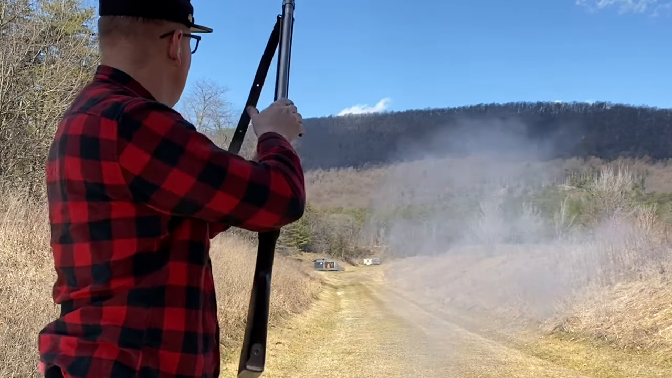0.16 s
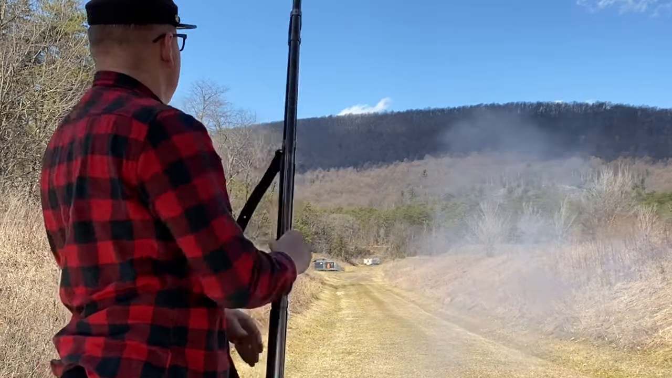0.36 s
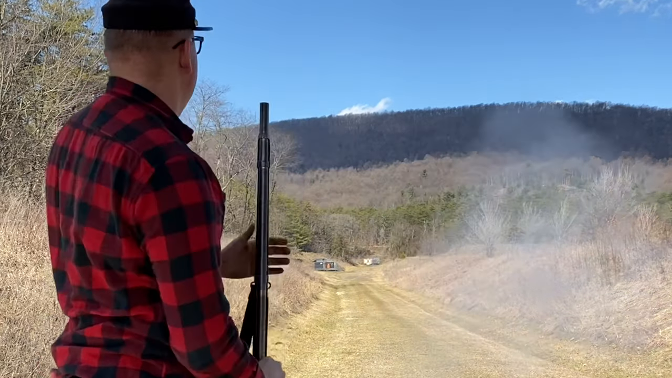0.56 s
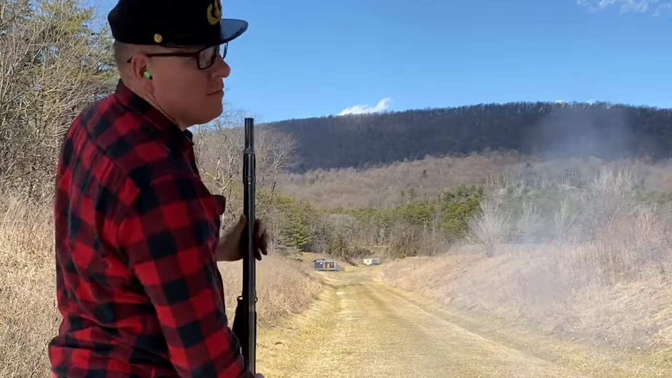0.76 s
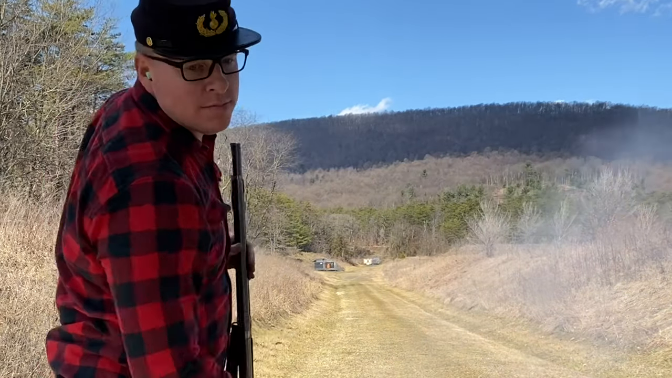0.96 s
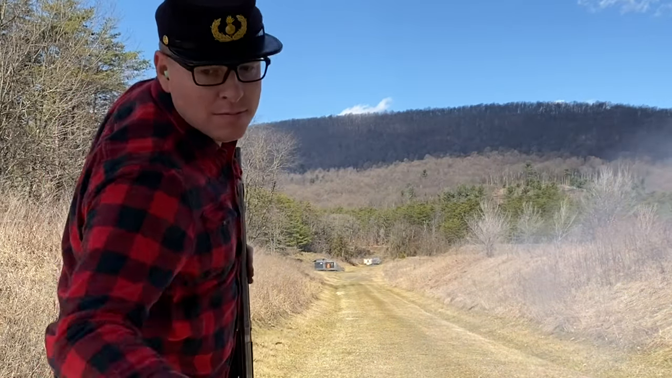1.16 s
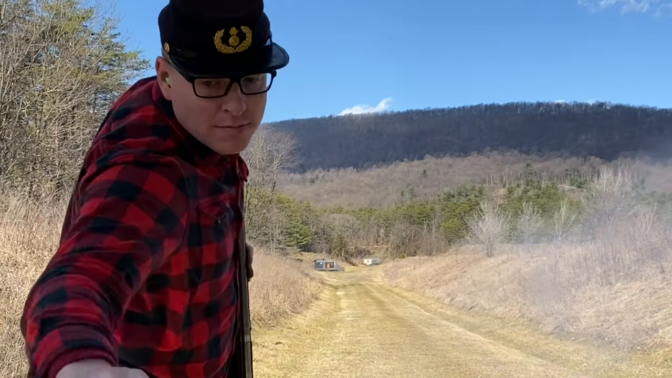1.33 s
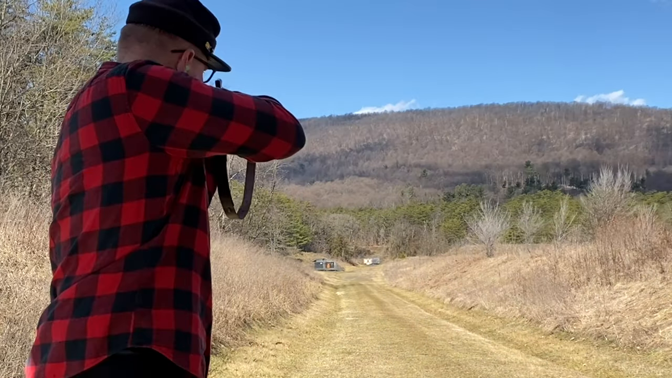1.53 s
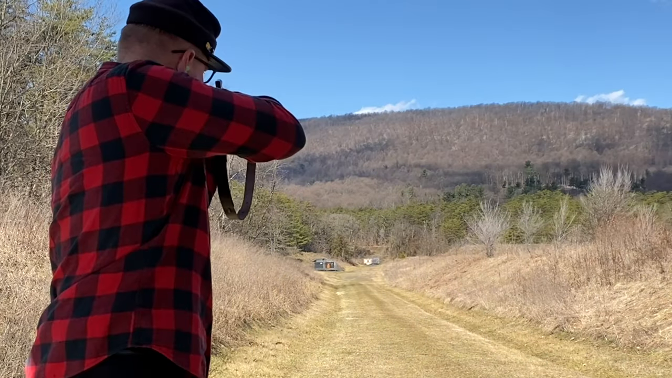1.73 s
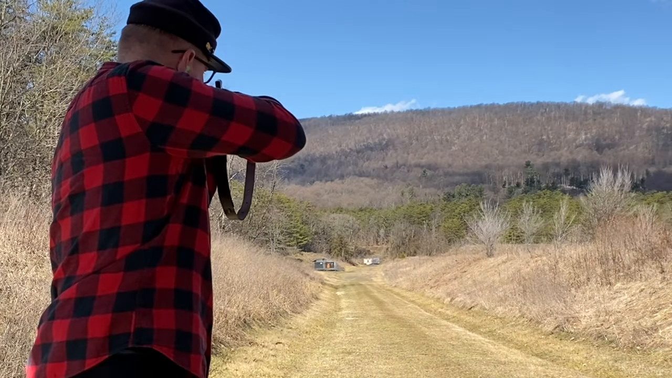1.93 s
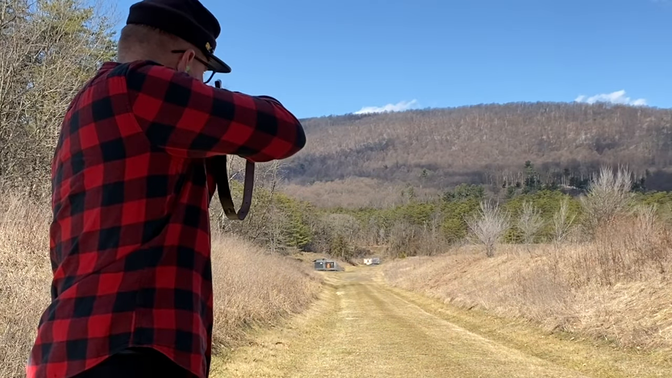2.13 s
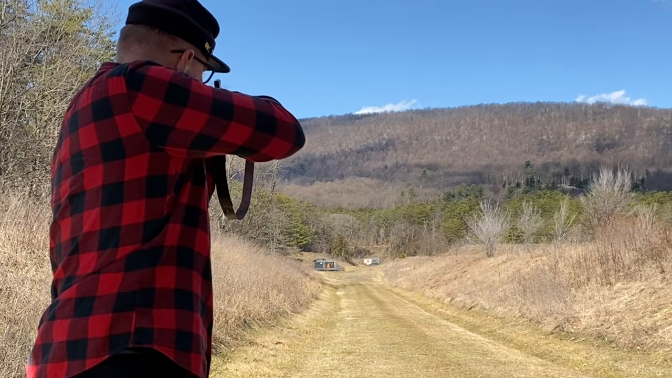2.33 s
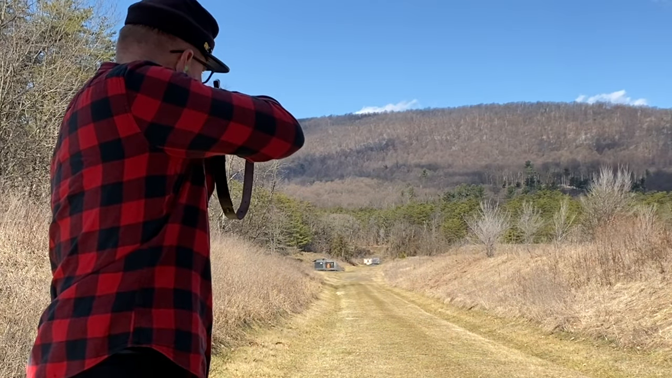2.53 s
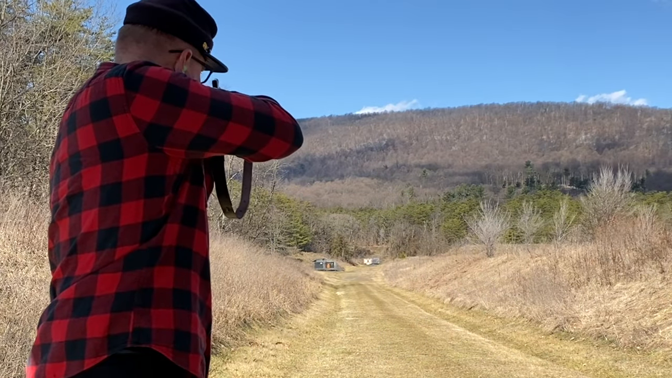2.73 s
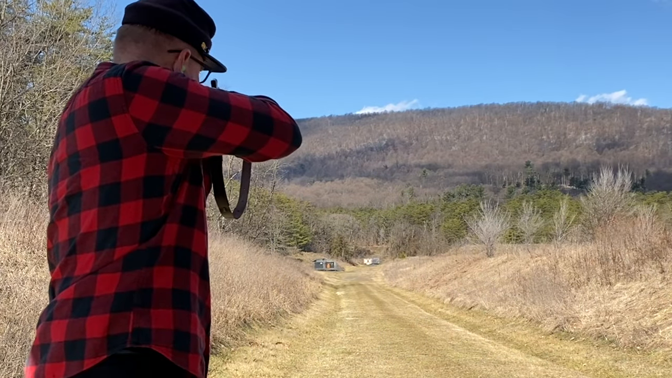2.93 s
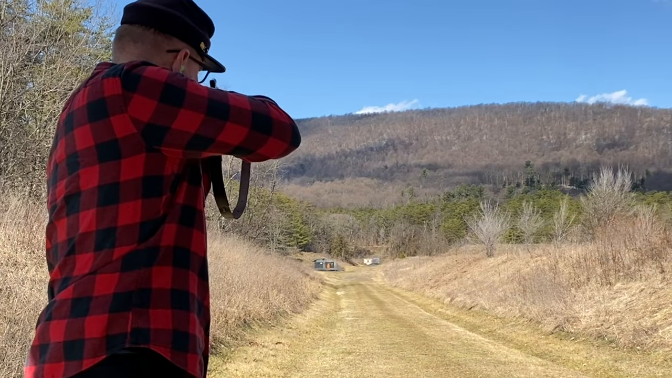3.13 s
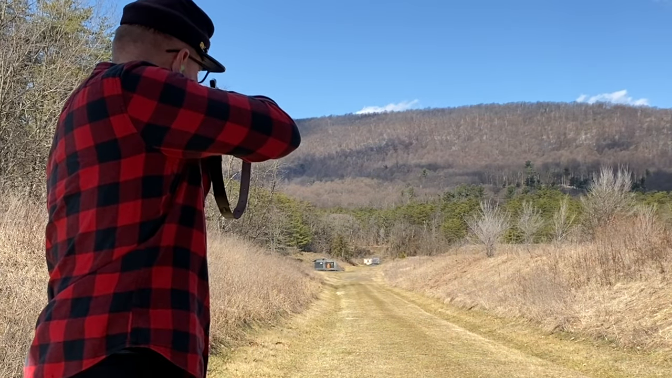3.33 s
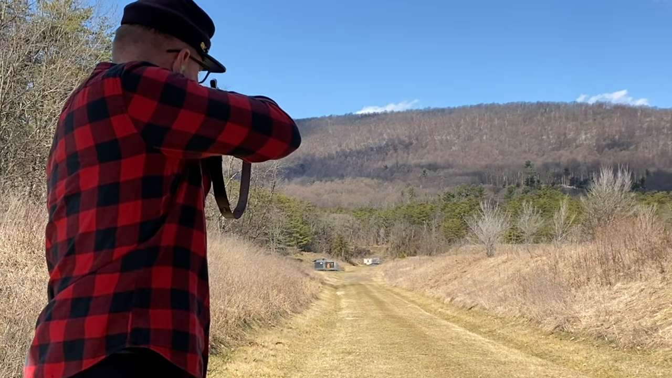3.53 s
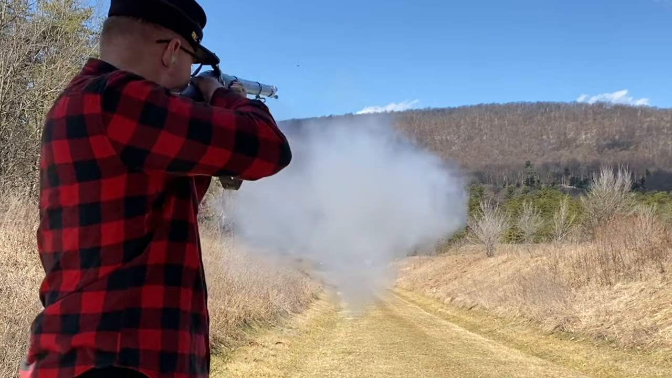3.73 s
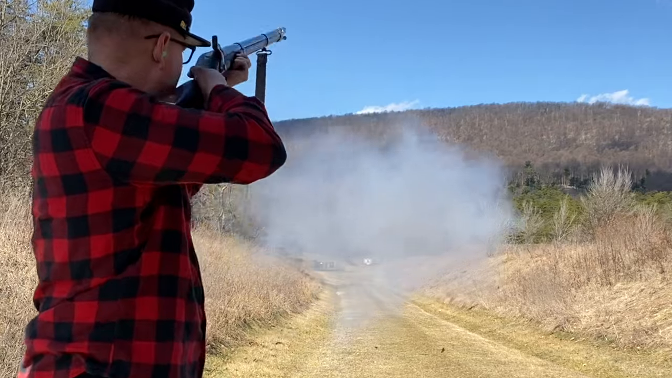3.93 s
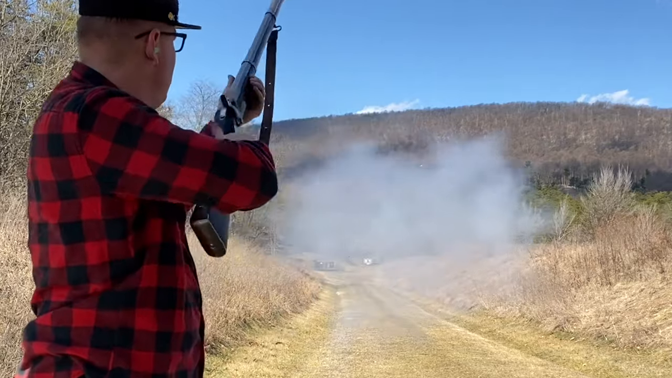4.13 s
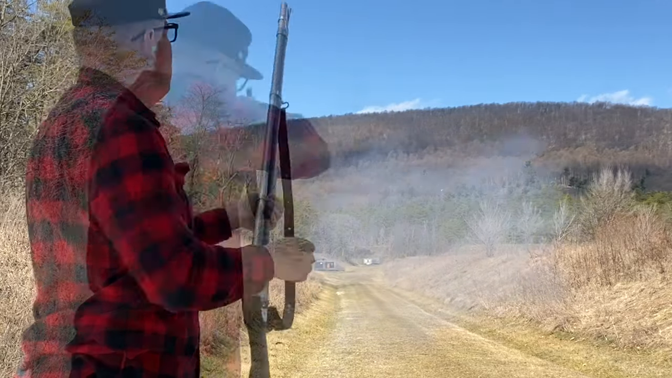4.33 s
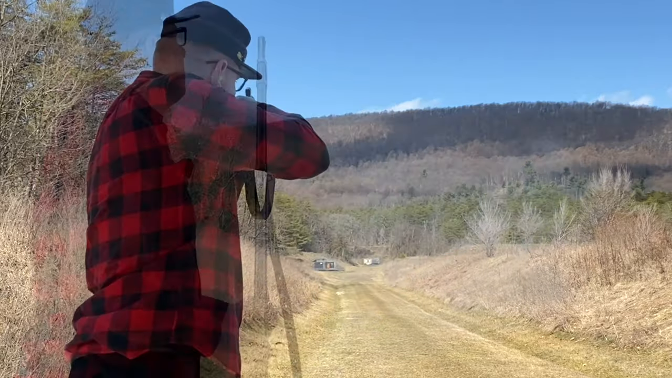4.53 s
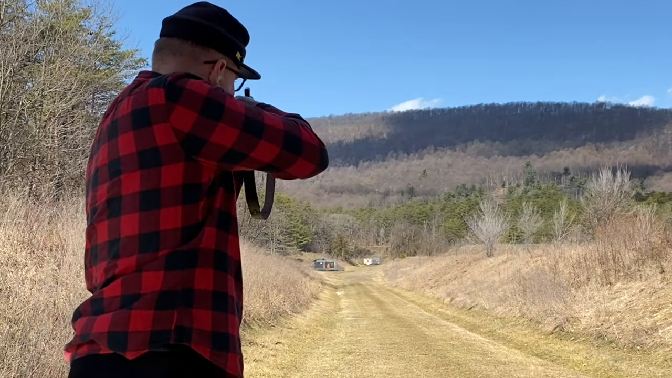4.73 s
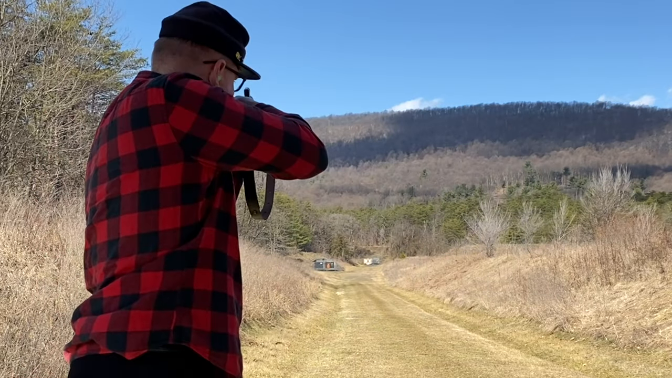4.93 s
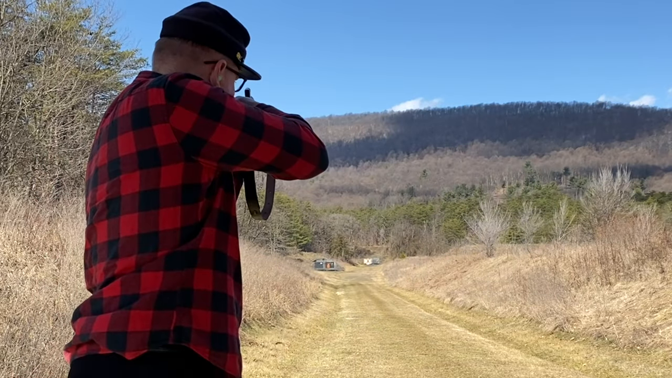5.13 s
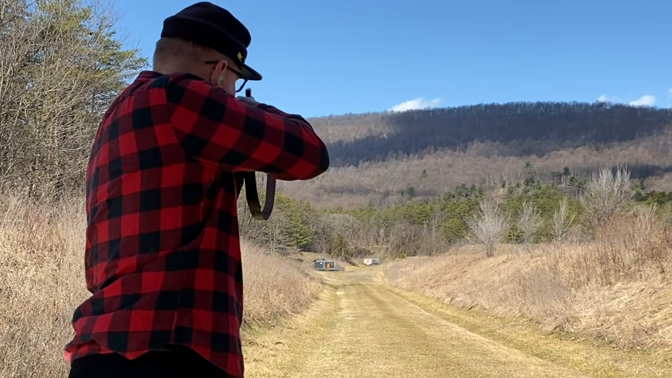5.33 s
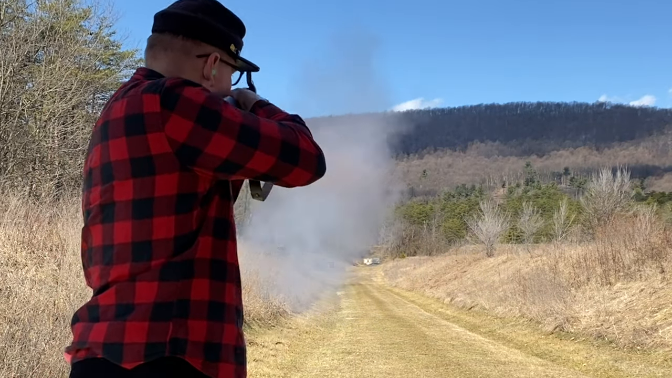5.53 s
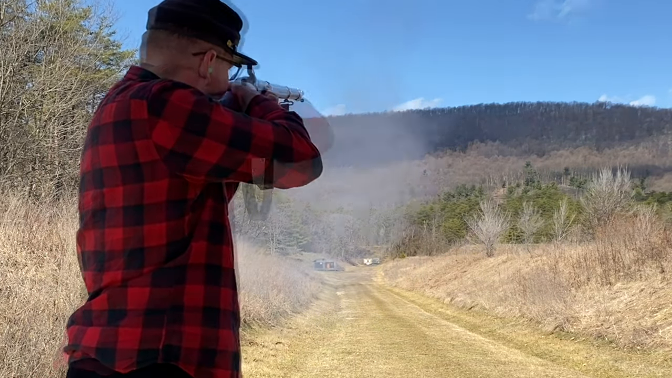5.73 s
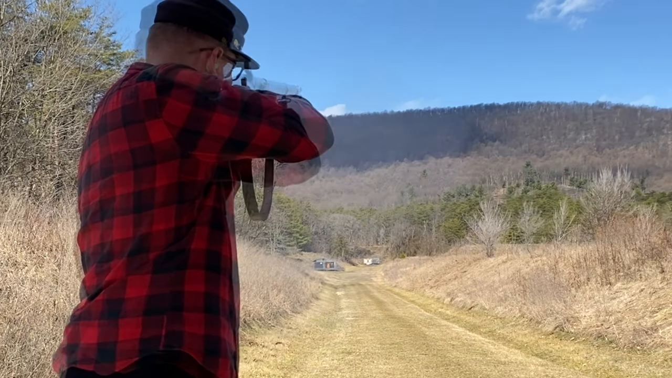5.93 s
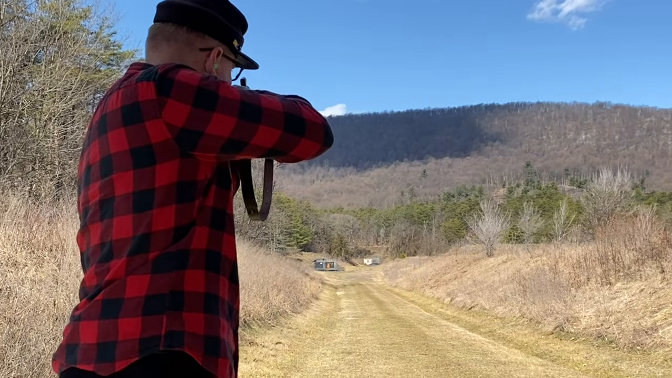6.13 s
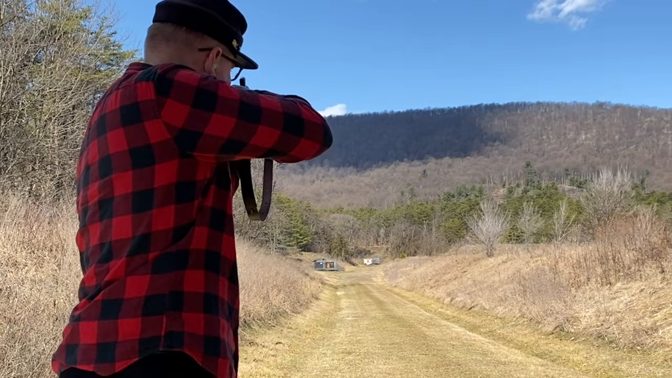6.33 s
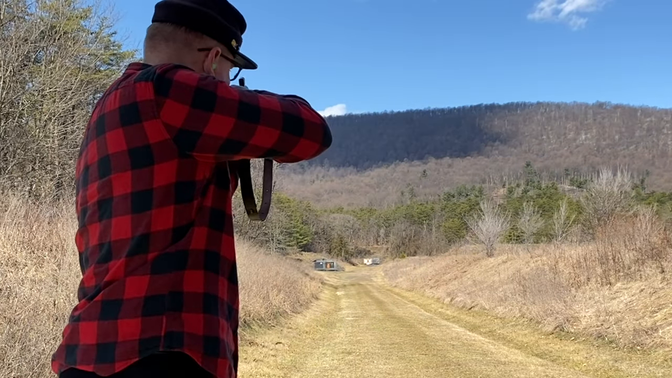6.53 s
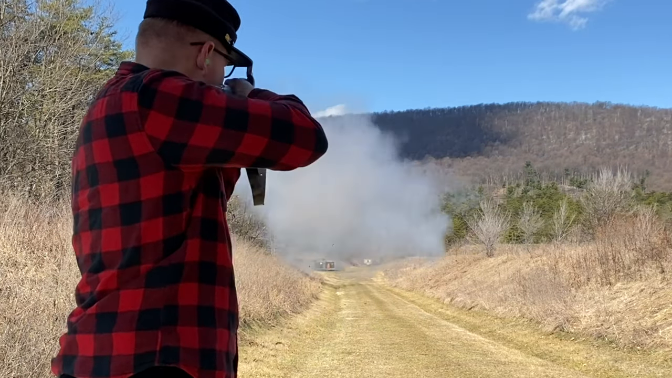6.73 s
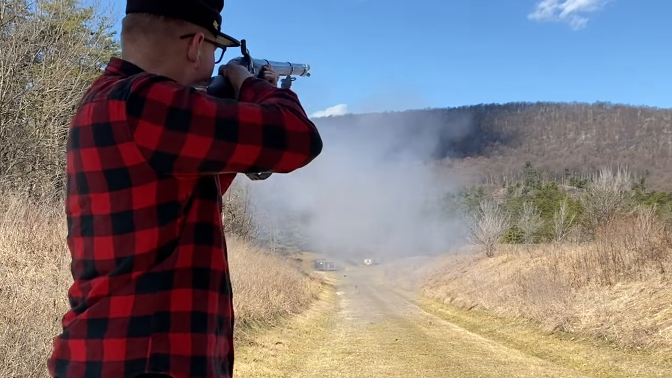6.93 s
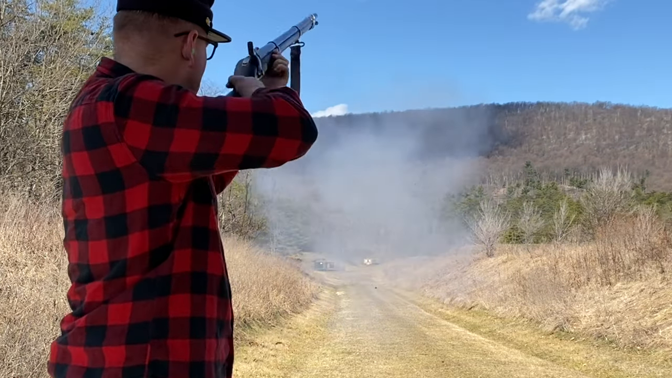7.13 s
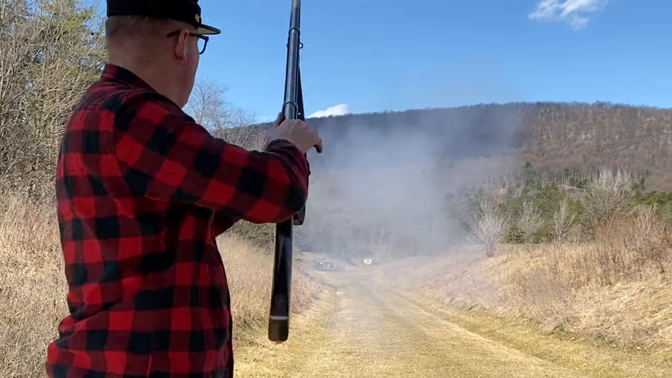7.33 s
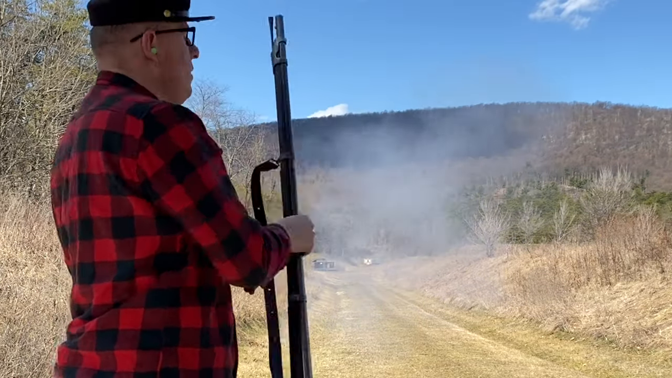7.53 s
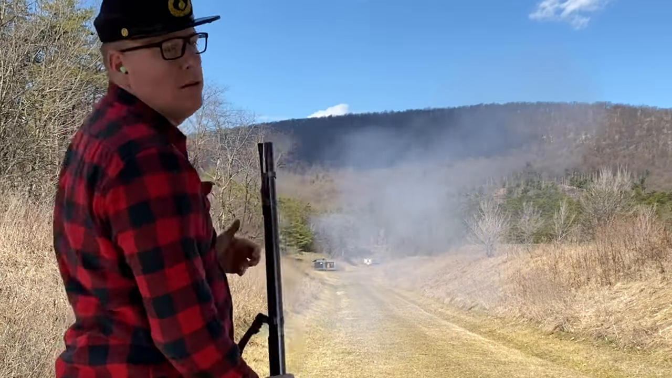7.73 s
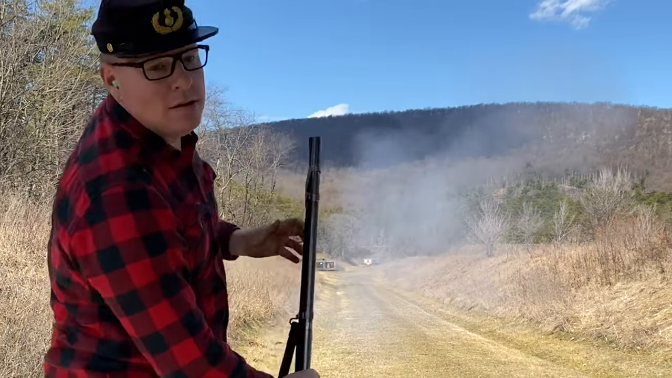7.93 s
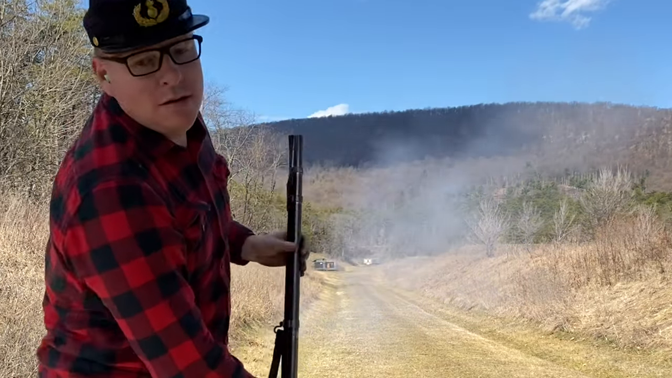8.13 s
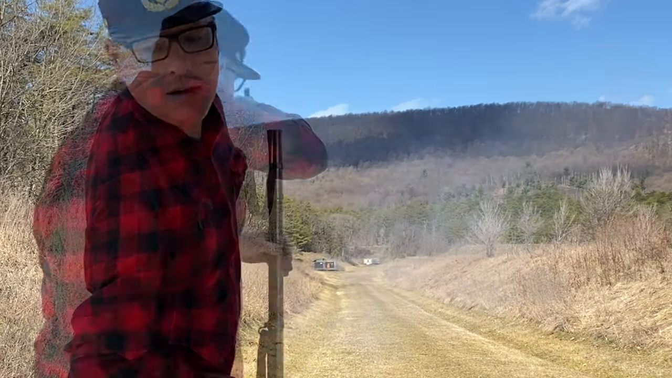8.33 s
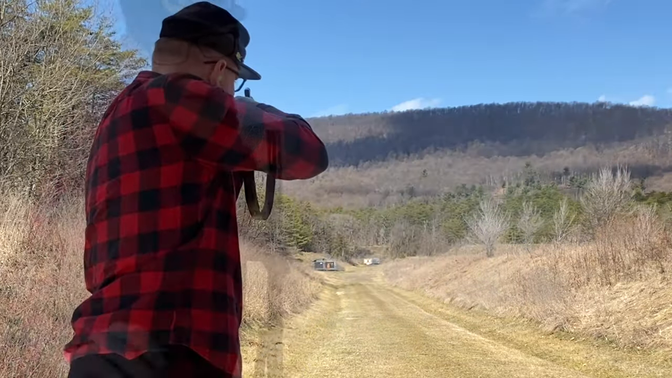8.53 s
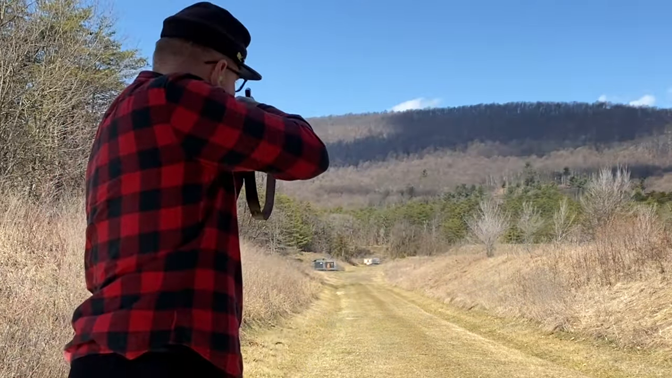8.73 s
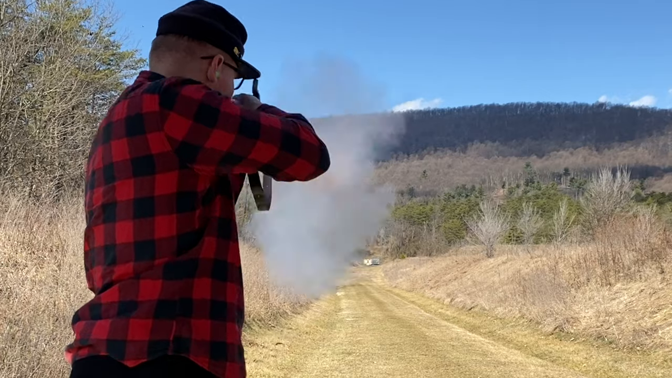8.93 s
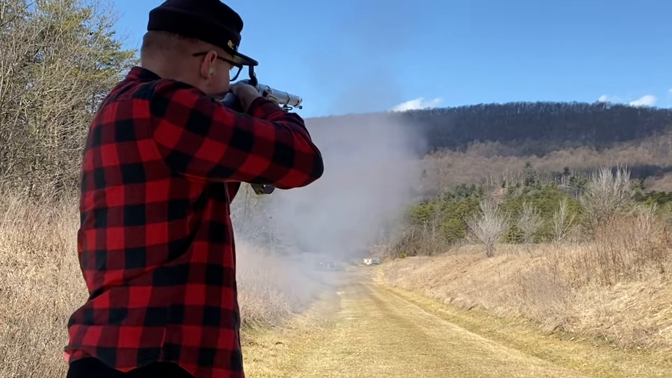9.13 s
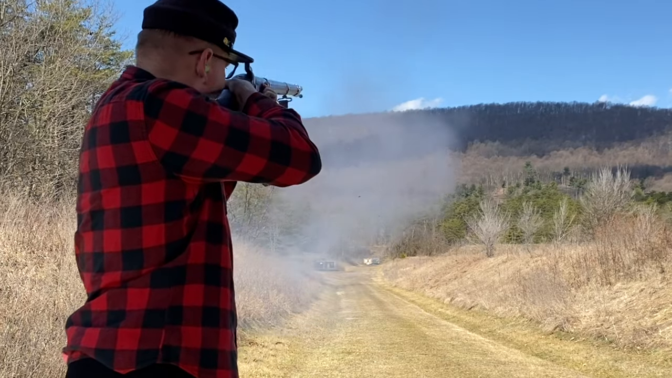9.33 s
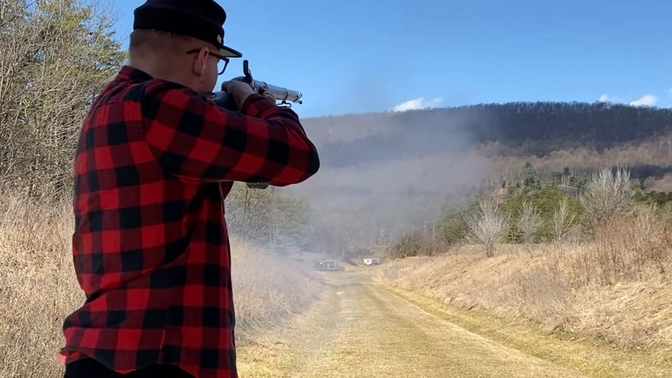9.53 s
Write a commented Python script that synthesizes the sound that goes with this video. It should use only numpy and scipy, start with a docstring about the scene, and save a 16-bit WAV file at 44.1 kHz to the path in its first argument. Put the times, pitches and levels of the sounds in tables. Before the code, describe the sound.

A small stereo microphone stands close to a black powder musket being fired in an open valley. A fading echo comes first, with faint metal ticks, a momentary drop in level, and low wind thuds. Four loud shots then crack and thump, each answered by nearby banks and a distant tree line. Handling clicks sound before the last shot; grass hisses softly throughout.

```python
"""A grassy range between wooded banks, a small stereo microphone near four musket shots.
A fifth, fired before the start, is still rolling away. Each shot is a crack of noise, with a hiss rising just
before it, and a boom of falling pitch that the ground and near banks repeat, then duller echoes from far banks
and the tree line, then the valley's coloured noise. Wind buffets the ports in lumps of low noise over a narrow
drone, dry grass hisses, dull puffs strike, sling and lock rattle in noisy ticks. The level dips briefly early on."""
import sys
import numpy as np
from scipy import signal
from scipy.fft import rfft, irfft, next_fast_len
from scipy.io import wavfile
from scipy.ndimage import uniform_filter1d, map_coordinates

SR = 44100
rng = np.random.default_rng(int(sys.argv[2]) if len(sys.argv) > 2 else 0)


def master(y):
    """Save y as 16-bit WAV."""
    cut = np.clip(np.atleast_2d(y).T, -1, 1)
    pcm = np.round(cut * 32767)  # scale
    wavfile.write(sys.argv[1], SR, pcm.astype(np.int16))


N = 422478

# Likeness of left and right. Each row: frequency in Hz, left-right correlation of the noise.
STEREO_LIKENESS = [(60, 0.97), (350, 0.58), (1000, 0.08), (1800, 0.28), (3000, 0.52), (6000, 0.081),
                   (7500, 0.83), (15000, .93)]

# The valley's answer, alike for every shot. Each row: seconds after the shot, body level in dB,
# treble level in dB, top level in dB.
VALLEY_COURSE = [(.07, -35.5, -21.5, 2), (.15, -28.5, -20, -13.5), (.19, -27, -19.5, -12),
                 (.26, -18.5, -18.5, -12.5), (.38, -19, -19.5, -21.5), (.52, -26.5, -27, -32),
                 (.68, -34, -31.5, -40), (.8, -36.5, -39, -46), (1.1, -40.5, -49.5, -51),
                 (1.5, -47.5, -57.5, -57), (1.9, -56.5, -54, -46)]
# Adjustment for each shot, earliest first. Each row: body in dB, treble in dB, top in dB, bass in dB,
# seconds after the shot when the extra fade begins, that fade in dB per second.
VALLEY_ANSWERS = [(4, 2, -6, -27, 2.06, 32), (0, -2, -2.5, -26, .6, 40.5), (4, 4, -1, -25.5, 0.43, 83.5),
                  (0.5, -1.5, -2, -30, 1.54, 43.5), (6.5, 6.5, -0.5, -23.5, .7, 30)]
# Colour of the valley. Each row: frequency in Hz, spectral level in dB.
VALLEY_COLOUR = [(60, -44), (170, -17.5), (250, -11.5), (328, 0), (385, -2), (440, -5.5), (560, -11),
                 (1060, -14), (1500, -22), (2000, -17.5), (3000, -19), (4870, -22.5), (7770, -34),
                 (9200, -38.5), (11000, -35), (16000, -44.5)]
# Colour of wind and of the valley's bass. Each row: frequency in Hz, spectral level in dB.
RUMBLE_COLOUR = [(12, -41.5), (20, -11.5), (64, 2), (80, 2), (92, -4), (113, -5.5), (166, -15),
                 (296, -28.5), (400, -30), (520, -69), (880, -120)]
# How far each course acts across the valley's spectrum. Each row: frequency in Hz, share.
VALLEY_BODY_SHARE = [(500, 0.84), (1800, 0.16)]
VALLEY_TREBLE_SHARE = [(500, 0.0097), (1800, 0.6), (3500, 1.0), (6000, 0.0033)]
VALLEY_TOP_SHARE = [(3500, 0.028), (6000, 0.89)]
EARLIER_SHOT_S = -.42  # fired before the start

# Wind on the ports. Each row: time in seconds, level in dB.
BUFFET_LEVEL = [(0, -47), (.88, -60.5), (1.41, -54), (1.47, -41), (1.5, -44.5), (1.74, -48.5),
                (2.88, -46.5), (3.47, -41), (4.1, -45.5), (4.35, -50.5), (4.61, -48.5), (4.96, -56),
                (5.3, -52), (5.89, -44.5), (6.25, -60), (7.1, -55.5), (8.24, -65.5), (8.81, -47),
                (9.07, -51), (9.58, -45)]
# Grass hiss ahead of its colour. Each row: time in seconds, level in dB, extra body in dB, extra treble in dB.
HISS_COURSE = [(0, -26.5, -14, -9), (.8, -43, 2.5, -0.5), (1.44, -36, -2.5, -16), (1.5, -38.5, 0, 1.5),
               (3.3, -39, 0, 3.5), (3.45, -39, 3, 7), (4.4, -40.5, 0.5, 1), (4.58, -43.5, 1.5, 2.5),
               (4.7, -41.5, 12, 7.5), (4.84, -41, 0.5, 4), (5.401, -40.5, 1.5, 3), (6.1, -34, -4, -6.5),
               (6.6, -35.5, -5, -12), (7.5, -54.5, -3, 7.5), (8.2, -47, -1, -4), (8.6, -42, -0.5, 2.5),
               (8.88, -41.5, 9, 6.5)]
# Colour of the dry grass. Each row: frequency in Hz, spectral level in dB.
GRASS_COLOUR = [(100, -39.5), (220, -3), (410, -5), (1180, -13), (1900, -21.5), (2300, -23.5), (2800, -22),
                (3500, -31.5), (4300, -28), (5100, -38.5), (6000, -36.5), (7300, -48.5), (11000, -51.5),
                (16000, -68)]
# How far the extras act across the hiss. Each row: frequency in Hz, share.
HISS_BODY_SHARE = [(600, 1.0), (1000, 0.0038)]
HISS_TREBLE_SHARE = [(1800, 0.066), (2800, 1.0), (6000, 1.1)]

# Contacts of sling and lock. Each row: start in seconds, tick level in dB, centre in Hz,
# scrape in dB relative to the tick, scrape t60 in seconds, top of the spectrum in dB.
RATTLE_CONTACTS = [(0.3274, -57, 2280, -10, 0.18, -24), (0.496, -62, 1570, -7, .17, -9),
                   (0.7427, -72, 1510, 3, 0.15, -25), (0.8464, -70, 1540, -1, 0.2, -13),
                   (1.0124, -71, 1690, -2, 0.19, -10), (1.8294, -61.5, 1820, -3.5, .17, -21),
                   (1.89, -61, 4170, -4.5, 0.43, -27), (2.5894, -66, 2650, -5, .2, -6),
                   (6.123, -50.5, 1830, -1.5, .3, -53), (7.339, -60, 1820, -7, 0.19, -25),
                   (7.6041, -46.5, 2780, -5.5, 0.13, -16), (7.6133, -46, 7100, -3, 0.06, 2),
                   (7.6244, -56, 6500, -9, 0.088, -3), (7.6849, -62, 2210, 0.5, 0.16, -16),
                   (7.6944, -61, 1910, -10, .1, -12), (7.7353, -55.5, 1820, -4, 0.18, -28),
                   (7.7491, -55, 1840, 0.5, 0.27, -16), (7.7674, -56, 4220, -5, 0.11, -9),
                   (7.7793, -52, 2040, -1.5, 0.069, 4), (7.7926, -36.5, 4400, -21, .13, -14),
                   (7.8444, -64, 3000, -12, .1, -10), (8.0845, -65, 3474, -2.5, 0.18, -17),
                   (8.0944, -62, 2380, -5, .14, -23), (8.1276, -62, 1790, -6, .13, -34)]
TICK_T60_S = 0.0037
# Dull puffs close on the microphone. Each row: start in seconds, level in dB, pitch in Hz.
PUFF_HITS = [(0.441, -42, 138), (1.004, -41.5, 80.5), (1.404, -39, 121), (1.44, -29, 101),
             (2.916, -29.5, 65.6), (3.037, -29, 57.5), (3.443, -31.5, 112.3), (3.535, -32, 102),
             (4.36, -37.5, 100), (4.604, -39.5, 117), (4.71, -34, 78), (4.808, -42.5, 214),
             (5.361, -35.5, 91.9), (6.029, -39, 52.4), (7.743, -40, 80)]
DIP_FROM_S, DIP_TO_S, DIP_DB = 1.455, 1.49, -24  # everything sinks for a moment, then is back at once
# A narrow low drone. Each row: time in seconds, level in dB ahead of its wavering.
DRONE_LEVEL = [(1.47, -92), (1.52, -44.5), (2.2, -44.5), (2.8, -49), (3, -71), (3.4, -87)]

# The four shots. Each row: start in seconds, boom reflections in dB, direct boom in dB, thump in dB,
# crack and the hiss before it in dB, time constant of that hiss's rise in seconds, crack centre in Hz,
# snap in dB, far echoes in dB, left over right in dB, brush in dB.
MUSKET_SHOTS = [(3.5883, -8.5, -6, -12, -21.5, 0.0085, 3195, -9.5, -24, 1.3, -25.5),
                (5.4333, -6.5, -8, -12.5, -9, 0.0096, 4830, -14.5, -16.5, 1, -24.5),
                (6.638, -13, -6.5, -12.5, -16, 0.0096, 3580, -10, -21, 0.5, -29),
                (8.8999, -6.5, -9, -11.5, -9, 0.0089, 4660, -9.5, -15.5, 1, -25.5)]
# Low swing of the blast. Each row: pitch in Hz, relative level in dB, t60 in seconds.
BLAST_SWING = [(72, 4, 0.058), (120, -1, 0.064), (183.4, -12, 0.33)]
# Direct sound, ground and near banks. Each row: delay in seconds, relative level in dB (unused for the
# direct boom), final pitch of the boom in Hz, t60 in seconds, left over right in dB.
NEAR_PATHS = [(0, -0.5, 283.6, 0.025, 1.5), (.0085, 1, 268.3, 0.087, 0), (0.0253, -7.5, 250, .07, 8),
              (.0440, -19, 270, 0.032, -2.5)]
# Far banks and tree line. Each row: delay in seconds, relative level in dB.
FAR_PATHS = [(0.115, -11.5), (.183, -6.5), (0.242, -10.5), (0.254, -12), (0.265, -28), (0.284, -3),
             (0.308, -10), (0.3256, 1.5), (.365, -21), (0.39, -20), (.415, -23.5), (.465, -33),
             (0.552, -16.5)]
# First answer of the brush. Each row: frequency in Hz, spectral level in dB.
BRUSH_COLOUR = [(25, -29.5), (60, -6), (120, -5.5), (170, -11), (300, -4), (585, -18), (800, -8),
                (1400, -14), (3000, -24.5), (6500, -29), (9000, -26), (11000, -26.5), (16000, -28.5)]
# Dying away of the brush. Each row: frequency in Hz, t60 in seconds.
BRUSH_T60 = [(60, 0.15), (300, 0.24), (1000, 0.19), (4000, 0.28), (15000, 0.069)]
# Colour of the snap. Each row: frequency in Hz, spectral level in dB.
SNAP_COLOUR = [(800, -14.5), (3000, 7.0), (7000, -2.5), (15000, -11.0)]

# Left and right channels differ in phase. Each row: frequency in Hz, radians by which the left channel leads.
CHANNEL_LEAD = [(0, 0), (1400, .7), (4800, .5), (7450, 0), (8400, -2.9), (9600, -3.2), (10500, -6.2),
                (11650, -6.3), (12600, -9.3), (13750, -9.5), (14700, -12.5)]
TOP_HZ = 16000  # band limit, 100 dB down here

SHOT_LEAD = SR // 25  # samples kept ahead of each shot for the rising hiss
SHOT_T = (np.arange(SR // 2) - SHOT_LEAD) / SR  # seconds from the shot
AFTER_T = np.maximum(SHOT_T, 0)
SHORT_T = np.arange(SR // 10) / SR  # seconds, time base of booms and puffs


def amp(db):
    """dB to gain."""
    return 10 ** (np.asarray(db) / 20)


def pan(db):
    """Gains that set the left channel db above the right."""
    return amp([[db / 2], [-db / 2]])


def unit(x):
    """x at rms 1."""
    return x / np.sqrt(np.mean(x ** 2) + 1e-20)


def along(points, hz):
    """Reads (Hz, value) points on a log frequency axis."""
    f, v = np.transpose(points)
    return np.interp(np.log(hz + 1), np.log(f + 1), v)


def wobble(rate):
    """A smooth random curve over the whole scene, rate knots a second."""
    knots = rng.standard_normal(int(N * rate / SR) + 4)
    return map_coordinates(knots, [np.arange(N) * rate / SR])


def filtered(x, response):
    """x times a complex response of frequency."""
    n = x.shape[-1]
    m = next_fast_len(n + SR // 4)
    return irfft(rfft(x, m) * response(np.fft.rfftfreq(m, 1 / SR)), m)[..., :n]


def coloured(x, spectrum):
    """x through (Hz, dB) points."""
    return filtered(x, lambda hz: amp(along(spectrum, hz)))


def band(centre_hz, width_hz):
    """The response of one resonance."""
    return lambda f: 1j * f * width_hz / (centre_hz ** 2 - f * f + 1j * f * width_hz)


def flat(hz, t):
    """No gain at any frequency or moment, in dB."""
    return 0 * hz


def patches(hz, t, depth_db):
    """A random gain field, smooth over a few hundred Hz and some hundredths of a second."""
    field = rng.standard_normal((len(hz), len(t)))
    field = uniform_filter1d(field, size=2, axis=0)
    return depth_db * unit(uniform_filter1d(field, size=14, axis=1))


def air(count, gain_db):
    """Stereo noise of a set left-right likeness, under a gain for each frequency and moment."""
    hz, t, z = signal.stft(rng.standard_normal((2, count)), SR, nperseg=256)
    turn = np.arccos(np.clip(along(STEREO_LIKENESS, hz), 0, 1))[:, None] / 2
    mid = z[0] * np.cos(turn)
    side = z[1] * np.sin(turn)
    stereo = np.array([mid + side, mid - side]) * amp(gain_db(hz[:, None], t))
    return signal.istft(stereo, SR, nperseg=256)[1][:, :count]


def add(track, s, sound):
    """Lays a sound on the track from second s."""
    k = round(s * SR)
    track[:, k:k + sound.shape[-1]] += sound[..., :N - k]


def valley_roll():
    """The valley answers each shot with noise along one course; body, treble and top die separately."""
    out = np.zeros((2, N))
    late, body, treble, top = np.transpose(VALLEY_COURSE)
    count = round((late[-1] - late[0]) * SR)
    t = np.arange(count) / SR
    edge = np.clip(np.minimum(t, t[::-1]) / 0.054, 0, 1)
    starts = [EARLIER_SHOT_S] + [row[0] for row in MUSKET_SHOTS]

    def at(course, t):
        return np.interp(t + late[0], late, course)

    for s, (body_db, treble_db, top_db, bass_db, fade_s, fade_db) in zip(starts, VALLEY_ANSWERS):
        def level(hz, t):
            total = along(VALLEY_BODY_SHARE, hz) * (at(body, t) + body_db)
            total = total + along(VALLEY_TREBLE_SHARE, hz) * (at(treble, t) + treble_db)
            total = total + along(VALLEY_TOP_SHARE, hz) * (at(top, t) + top_db)
            return total + patches(hz, t, depth_db=2.0)

        noise = coloured(air(count, level), VALLEY_COLOUR)
        bass = amp(bass_db + 0.97 * at(body, t)) * unit(coloured(air(count, flat), RUMBLE_COLOUR))
        fade = amp(-fade_db * np.maximum(t + late[0] - fade_s, 0))
        answer = (noise + bass) * edge * fade
        gone = max(0, round(-(s + late[0]) * SR))  # samples already past at the start
        add(out, max(s + late[0], 0), answer[:, gone:])
    return out * amp(0.27 * wobble(40))


def wind_buffeting():
    """Wind on the ports: low noise swelling in random lumps."""
    now = np.arange(N) / SR
    lumps = amp(2.2 * wobble(14)) * air(N, flat)
    return amp(np.interp(now, *np.transpose(BUFFET_LEVEL))) * unit(coloured(lumps, RUMBLE_COLOUR))


def grass_hiss():
    """Dry grass hisses: patchy noise whose level, body and treble vary in time."""
    s, level_db, body_db, treble_db = np.transpose(HISS_COURSE)

    def shape(hz, t):
        body = along(HISS_BODY_SHARE, hz) * np.interp(t, s, body_db)
        treble = along(HISS_TREBLE_SHARE, hz) * np.interp(t, s, treble_db)
        return np.interp(t, s, level_db) + body + treble + patches(hz, t, depth_db=2.0)

    return amp(0.44 * wobble(9.3)) * coloured(air(N, shape), GRASS_COLOUR)


def rattles():
    """Each contact of sling or lock is a noise tick with a scratchy, slower-dying tail."""
    out = np.zeros((2, N))
    t = np.arange(SR // 5) / SR
    for s, db, centre_hz, scrape_db, t60, top_db in RATTLE_CONTACTS:
        colour = [(600, -25), (centre_hz * .75, -3), (centre_hz, 0), (centre_hz + 1300, -2),
                  (centre_hz + 1900, top_db * .2 - 2), (8600, top_db * .45), (9200, top_db), (15000, top_db)]
        noise = unit(air(len(t), lambda hz, t: along(colour, hz)))
        tick = amp(-60 * t / TICK_T60_S)
        scrape = amp(scrape_db - 60 * t / t60)
        add(out, s, amp(db) * noise * (tick + scrape))
    return out


def puffs():
    """Each dull puff is a low sine with a quick onset, 60 dB down after nine cycles."""
    out = np.zeros((2, N))
    t = SHORT_T
    for s, db, hz in PUFF_HITS:
        shape = (1 - np.exp(-t / 0.0004)) * amp(-60 * t * hz / 9)
        add(out, s, amp(db) * np.sin(2 * np.pi * hz * t) * shape)
    return out


def low_drone():
    """A sine near 83 Hz, its pitch and level wavering at random."""
    now = np.arange(N) / SR
    hz = 83 + 5 * wobble(11)
    level_db = np.interp(now, *np.transpose(DRONE_LEVEL)) + 2.4 * wobble(11)
    return amp(level_db) * unit(np.sin(2 * np.pi * np.cumsum(hz) / SR))


def hiss_and_crack(rise_s, centre_hz):
    """Banded noise: a hiss rising just before the shot, then a crack that dies fast."""
    colour = [(300, -20), (1000, -16), (centre_hz * 0.67, -1), (centre_hz * 0.75, -7), (centre_hz * 1.04, 1),
              (centre_hz * 1.25, -6), (7800, -7), (9000, -30), (9600, -48)]
    rise = np.exp(np.minimum(SHOT_T + 0.0008, 0) / rise_s) * np.clip((SHOT_T + 0.025) / .006, 0, 1)
    decay = amp(-60 * AFTER_T / .025)
    noise = air(len(SHOT_T), lambda hz, t: along(colour, hz) + patches(hz, t, depth_db=1.0))
    return rise * decay * unit(noise)


def brush():
    """The brush scatters the shot back as noise that dies at its own rate in each band."""
    scatter = air(len(SHOT_T), lambda hz, t: -60 * t / along(BRUSH_T60, hz) + patches(hz, t, depth_db=1.8))
    out = np.zeros((2, len(SHOT_T)))
    onset = 1 - np.exp(-AFTER_T[SHOT_LEAD:] / 0.0016)
    out[:, SHOT_LEAD:] = unit(coloured(scatter, BRUSH_COLOUR))[:, :-SHOT_LEAD] * onset
    return out


def thump():
    """The low swing of the blast: decaying sines, the right channel 1.1 radians ahead."""
    out = np.zeros((2, len(SHOT_T)))
    for hz, db, t60 in BLAST_SWING:
        swing = np.sin(2 * np.pi * hz * AFTER_T + [[0], [1.1]]) * (1 - np.exp(-AFTER_T / 0.002))
        out += amp(db - 60 * AFTER_T / t60) * swing
    return out


def boom(start_hz, end_hz, t60, turn):
    """The gas bubble at the muzzle rings lower as it grows; the ports hear it turn radians apart."""
    t = SHORT_T
    hz = end_hz + (start_hz - end_hz) * np.exp(-t / .0022)
    ring = np.sin(2 * np.pi * np.cumsum(hz) / SR + [[0], [turn]])
    return ring * amp(-60 * t / t60) * (1 - np.exp(-t / 0.0012))


def near_booms(boom_db, direct_db, bright):
    """The boom direct and off ground and near banks, each path with a burst of bright noise."""
    out = np.zeros((2, len(SHOT_T)))
    for delay, db, end_hz, t60, side_db in NEAR_PATHS:
        wave = boom(900, end_hz, t60, turn=0.97) * pan(side_db)
        wave_db = boom_db + db if delay else direct_db
        add(out, SHOT_LEAD / SR + delay + .0012, amp(wave_db) * wave)
        late = SHOT_T - delay
        burst = (late > -.002) * amp(-60 * np.abs(late) / 0.026)
        out += amp(boom_db - 11.5 + 4.5 * db) * bright * burst
    return out


def far_echo():
    """Distance leaves a dull tick and two beats of the boom, direct and off the ground."""
    beat = boom(362, 348, t60=0.04, turn=0.6)
    beats = beat + .8 * np.roll(beat, round(.0092 * SR), axis=1)
    beats = np.roll(beats, round(.003 * SR), axis=1)
    tick = rng.standard_normal(beat.shape) * amp(1 - 60 * SHORT_T / .02)
    dull_beats = filtered(beats, lambda f: 1 / (1 + 1j * f / 1500) ** 2)
    dull_tick = filtered(tick, lambda f: band(1200, 1800)(f) ** 3)
    return (dull_beats + dull_tick) * pan(2.4)


def musket_shots():
    """Each shot sums hiss and crack, snap, booms, thump and brush, then far banks and tree line echo it."""
    out = np.zeros((2, N))
    for (s, boom_db, direct_db, thump_db, crack_db, rise_s, crack_hz,
         snap_db, far_db, pan_db, brush_db) in MUSKET_SHOTS:
        bright = unit(air(len(SHOT_T), lambda hz, t: along(SNAP_COLOUR, hz)))
        shot = amp(crack_db) * hiss_and_crack(rise_s, crack_hz)
        shot += amp(snap_db - 60 * np.abs(SHOT_T - .001) / .006) * bright  # snap
        shot += near_booms(boom_db, direct_db, bright)
        shot += amp(thump_db) * thump()
        shot += amp(brush_db) * brush()
        add(out, s - SHOT_LEAD / SR, shot * pan(pan_db))
        for delay, db in FAR_PATHS:
            add(out, s + delay, amp(far_db + db) * far_echo())
    return out


def scene():
    """All the layers together, with one brief dip in level."""
    now = np.arange(N) / SR
    fall = np.clip((now - DIP_FROM_S) / (DIP_TO_S - DIP_FROM_S), 0, 1)
    rise = np.clip((DIP_TO_S - now) / 0.0047 + 1, 0, 1)
    mix = valley_roll() + wind_buffeting() + grass_hiss() + rattles() + puffs() + low_drone() + musket_shots()
    return mix * amp(DIP_DB * fall * rise)


def record(dry):
    """Left and right channels differ in phase, the deepest bass and the top are cut, loud peaks round off."""
    def channel_response(hz):
        lead = np.interp(hz, *np.transpose(CHANNEL_LEAD))
        return np.exp(np.outer([.5j, -.5j], lead)) / (1 + (30 / (hz + 1)) ** 4)

    channels = filtered(dry, channel_response)
    soft = channels / (1 + np.abs(channels / .88) ** 6) ** (1 / 6)  # peaks approach .88
    return filtered(soft, lambda hz: amp(-100 * np.clip((hz - TOP_HZ) / 300 + 1, 0, 2) ** 2))


dry = scene()
out = record(dry)
master(out)
```